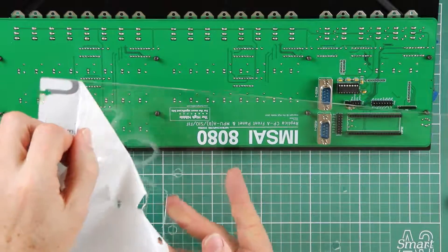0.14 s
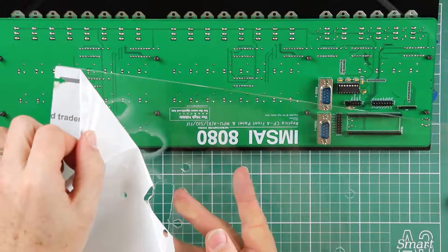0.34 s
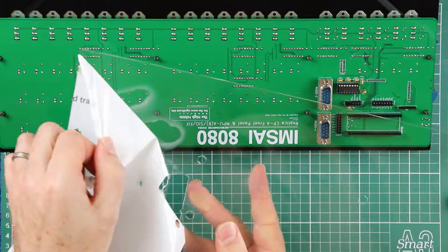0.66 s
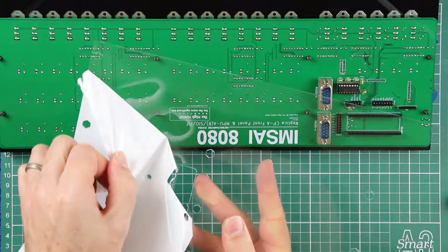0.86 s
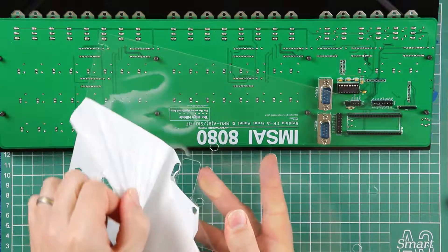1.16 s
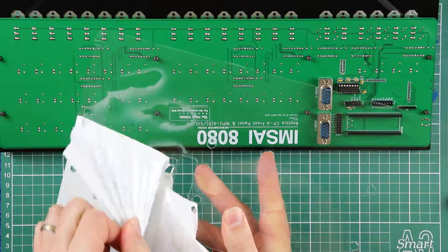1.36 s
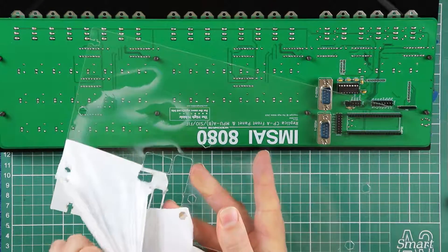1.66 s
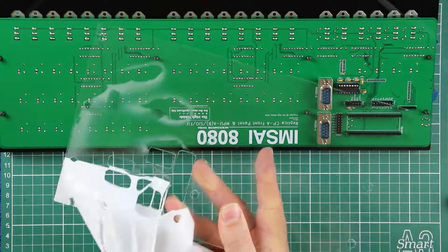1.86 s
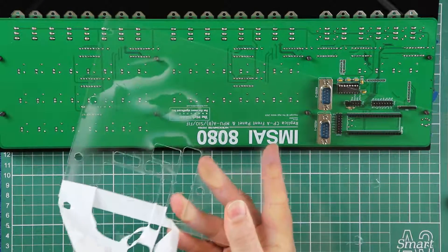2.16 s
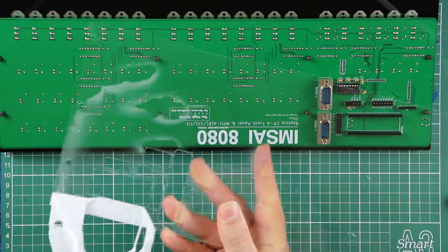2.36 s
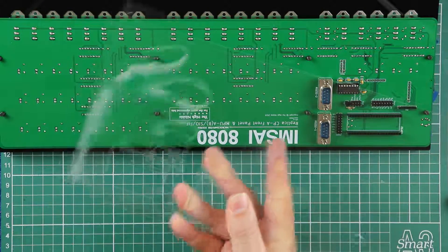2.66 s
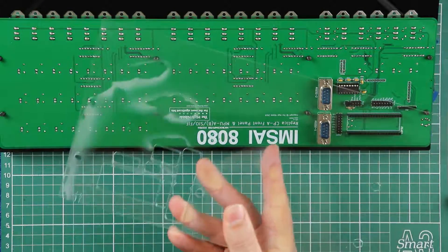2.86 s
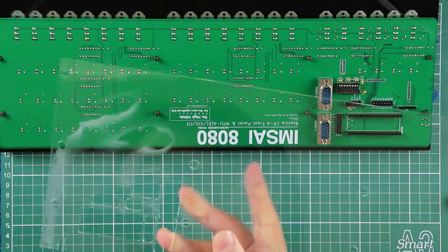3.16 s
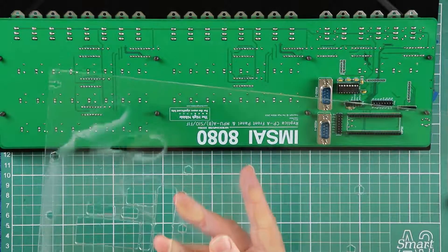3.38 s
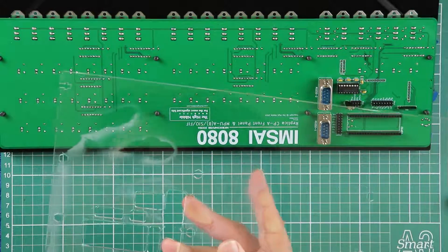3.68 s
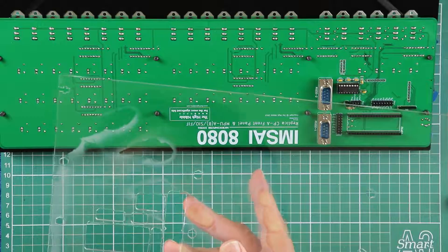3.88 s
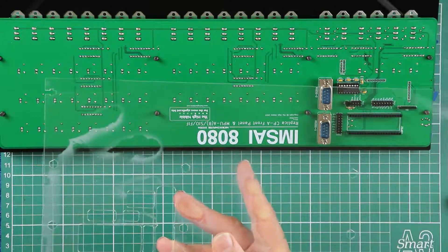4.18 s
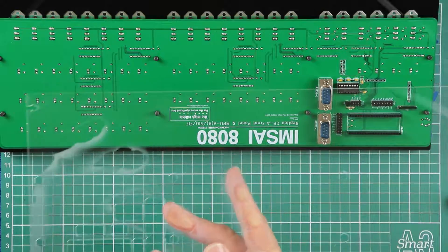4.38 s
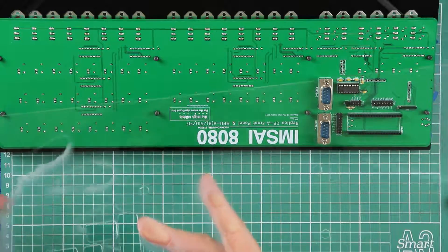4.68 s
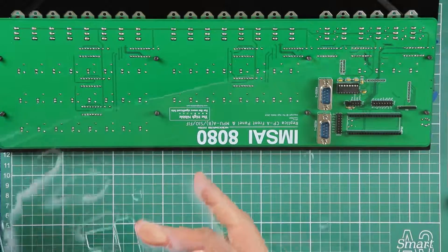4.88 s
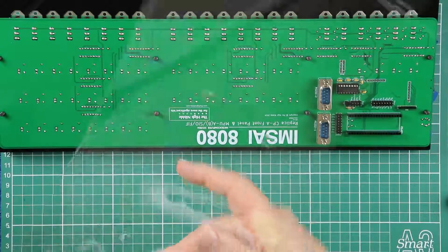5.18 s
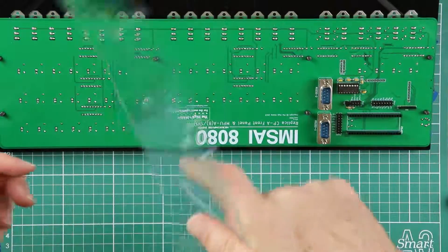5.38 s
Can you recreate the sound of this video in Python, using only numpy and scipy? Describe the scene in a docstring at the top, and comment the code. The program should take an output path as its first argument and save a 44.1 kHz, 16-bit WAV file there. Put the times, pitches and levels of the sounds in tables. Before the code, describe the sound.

Close to one microphone in a live room, film peels from an acrylic sheet: soft rubbing first, isolated snaps, then dense sizzling rips and bright crinkles for about two seconds. A strong pop frees a large piece, two shorter rips follow, and a loose swish puts the film aside. The end is nearly silent, with faint room air and hum.

```python
"""Peeling film off an acrylic sheet

Protective film is peeled off an acrylic sheet above a work table, close to one microphone in a live room.
The glue parts in a sizzle of dense grains; taut film snaps, slack film crinkles and taps, as shaped noise bursts.
Buckling patches pop as clusters of sines, and the bent sheet drones as noise through its bending modes.
Loose film swishes in swells of noise, loudest as it is put aside. Air noise and a faint hum lie underneath."""
import sys
import numpy as np
from scipy import signal
from scipy.fft import rfft, irfft, next_fast_len
from scipy.io import wavfile
from scipy.ndimage import uniform_filter1d, map_coordinates

SR = 44100
rng = np.random.default_rng(int(sys.argv[2]) if len(sys.argv) > 2 else 0)


def store_wav(level_fs):
    """Save 16-bit WAV to argv[1]."""
    pcm = np.round(np.clip(np.atleast_2d(level_fs), -1, 1) * 32767)
    wavfile.write(sys.argv[1], SR, pcm.T.astype(np.int16))


N = 244301


def amp(db):
    """Level law: decibels to amplitude gain."""
    return 10 ** (np.asarray(db) / 20)


def unit(x):
    """Normalisation: scale to rms 1."""
    return x / np.sqrt(np.mean(x ** 2) + 1e-20)


def along(points, hz):
    """Interpolation of (Hz, value) points on a logarithmic frequency axis."""
    point_hz, values = np.transpose(points)
    return np.interp(np.log(hz + 1), np.log(point_hz + 1), values)


def wobble(rate):
    """Slow random modulation: a smooth curve through random knots, rate of them a second."""
    return map_coordinates(rng.standard_normal(2048), [np.arange(N) * rate / SR], mode="wrap")


def filtered(x, response):
    """Linear filtering: the spectrum is multiplied by a response of frequency."""
    m = next_fast_len(len(x) + 8192)
    spectrum = rfft(x, m) * response(np.fft.rfftfreq(m, 1 / SR))
    return irfft(spectrum, m)[:len(x)]


def coloured(x, spectrum):
    """Spectral shaping: x filtered by a (Hz, dB) curve, at rms 1."""
    return unit(filtered(x, lambda hz: amp(along(spectrum, hz))))


def add(track, s, sound):
    """Superposition: mix a sound in at time s."""
    i = int(np.clip(round(s * SR), 0, N - 1))
    track[i:i + len(sound)] += sound[:N - i]


def gesture(start, length, attack, t60, slack=0):
    """Movement envelope: rises up to its start, holds while slackening in dB per s, then decays exponentially."""
    t = np.arange(round((attack + length + t60) * SR)) / SR - attack
    rise = np.minimum(1 + t / attack, 1) ** 2
    hold = amp(-slack * np.clip(t, 0, length))
    decay = 1000. ** (-np.maximum(t - length, 0) / t60)
    gain = np.zeros(N)
    add(gain, start - attack, rise * hold * decay)
    return gain


def background(air_db=-70):
    """Stationary noise floor: coloured noise for room air and microphone hiss, phase-wavering sines for hum."""
    # still air and hiss, relative spectrum: hz, level_db
    air_spectrum = [(18, -46), (30, -12.5), (98, -2), (145, -11), (199, -25), (273, -16), (740, -24.5),
                    (1010, -38.5), (5900, -55), (11700, -31), (13000, -24), (16000, -32.5)]
    # hum tones, rms: pitch_hz, level_db
    hum_tones = [(100.5, -72.5), (134.6, -79)]
    t = np.arange(N) / SR
    hum = np.zeros(N)
    for hz, db in hum_tones:
        hum += amp(db) * np.sqrt(2) * np.sin(2 * np.pi * hz * t + 0.2 * wobble(3))
    return hum + amp(air_db) * coloured(rng.standard_normal(N), air_spectrum)


def sheet(drone_trim_db=-2, rumble_trim_db=-1):
    """Forced plate vibration: noise excites resonant bending modes, and swaying pushes air as low noise."""
    # the pull bends the sheet: start_s, length_s, level_db (before the drone trim)
    bends = [(.17, .27, -60), (.65, 0.11, -56), (1.32, 0.048, -61), (1.59, 0.11, -56), (1.87, 0.042, -48.5),
             (2.03, 0.042, -60.5), (2.29, .2, -58), (2.6, .06, -57), (3.02, 0.065, -63),
             (3.36, 0.33, -50.5), (3.76, 0.3, -64), (4.38, 0.12, -56), (4.98, .1, -71), (5.41, 0.15, -66)]
    # the sheet sways and pushes air: start_s, length_s, level_db (before the rumble trim)
    sways = [(.32, 0.27, -60), (1.34, .05, -62.5), (1.58, 0.11, -53.5), (2.25, 0.13, -53),
             (2.52, 0.14, -55), (2.97, .18, -60.5), (3.57, .8, -62.5), (4.5, 0.18, -50.5),
             (5.39, 0.066, -57)]
    # bending modes: pitch_hz, width_hz, relative level_db
    bending_modes = [(185, 8.9, -0.5), (239, 59, -17.5), (431.5, 190, -20.5)]
    # pushed air, relative spectrum: hz, level_db
    rumble_spectrum = [(11, -30.5), (18, -2), (38, 4.5), (65, -4), (103, -4.5), (140, -14), (180, -34),
                       (310, -120)]
    attack_s, release_t60_s = 0.052, 0.43
    held_drone_db, held_rumble_db = -78, -72  # floors while the sheet is only held, before the trims

    def moved(rows):
        return sum(amp(db) * gesture(s, length, attack_s, release_t60_s) for s, length, db in rows)

    def plate(f):
        total = 0
        for k, (centre, width, db) in enumerate(bending_modes):
            damping = 1j * f * width
            total = total + (-1) ** k * amp(db) * damping / (centre ** 2 - f ** 2 + damping)
        return total / (1 + (f / 520) ** 4)  # the upper skirts roll off

    drone_level = np.hypot(amp(held_drone_db), moved(bends))
    rumble_level = np.hypot(amp(held_rumble_db), moved(sways))
    drone = unit(filtered(rng.standard_normal(N), plate))
    rumble = coloured(rng.standard_normal(N), rumble_spectrum)
    return drone_level * amp(drone_trim_db) * drone + rumble_level * amp(rumble_trim_db) * rumble


def grains(rate, spread_db, smooth):
    """Shot noise: tiny clicks of uneven size at random moments, over a share of smooth noise."""
    sizes = amp(spread_db * np.minimum(rng.standard_normal(N), 2))
    clicks = (rng.random(N) < rate / SR) * rng.choice([-1, 1], N) * sizes
    return unit(unit(clicks) + smooth * rng.standard_normal(N))


def patchy(x, depth_db):
    """Time-varying colour of the flexing film: gains wander over frequency and time."""
    z = signal.stft(x, nperseg=512)[2]
    field = rng.standard_normal(z.shape)
    for _ in range(2):
        field = uniform_filter1d(uniform_filter1d(field, size=6, axis=0), size=9, axis=1)
    return unit(signal.istft(z * amp(depth_db * unit(field)), nperseg=512)[1][:N])


def pulling():
    """Stroke envelopes: the summed gains of sizzle and rubbing as the film parts and slides."""
    # strokes: start_s, length_s, rise_s, sizzle_db, rub_db (levels before trims), slackening_db_per_s
    pulls = [(.001, 0.52, .001, -50.5, -52, 53), (0.287, 0.049, 0.14, -45, -66.5, 38),
             (0.813, 0.14, 0.057, -38.5, -46.5, 101), (1.019, .33, 0.021, -39.5, -54.5, 24),
             (1.377, 0.21, 0.045, -40.5, -62, 10.5), (1.58, 0.13, 0.11, -63, -55.5, 52.5),
             (1.823, .15, 0.15, -52.5, -56.5, 0), (2.164, 0.1, .02, -58, -53, -3),
             (2.279, .12, .06, -41.5, -48.5, 4), (2.667, 0.25, .02, -44, -65, 24),
             (3.065, 0.013, 0.12, -54, -58.5, -1), (3.313, 0.15, 0.056, -36.5, -51, 16),
             (3.464, 0.24, 0.022, -70, -55, 28), (3.683, 0.12, 0.14, -37, -48.5, 17),
             (3.822, 0.27, 0.016, -49.5, -51, 43.5), (4.291, 0.082, 0.0403, -59.5, -70, 2),
             (4.427, 0.14, 0.032, -68, -42, 74), (5.387, 0.17, .36, -65.5, -71, 25)]
    release_t60_s = .17
    strokes = np.array([gesture(s, length, rise, release_t60_s, slack)
                        for s, length, rise, _, _, slack in pulls])
    levels_db = [(sizzle_db, rub_db) for _, _, _, sizzle_db, rub_db, _ in pulls]
    return amp(levels_db).T @ strokes


def peeling(sizzle_trim_db=-5, rub_trim_db=-2, flutter_db=1.0):
    """Adhesive fracture and friction: threads break in sizzle and crackle as film rubs; all waver with the pull."""
    # relative spectra of breaking glue, rubbing film and scattered crackles: hz, level_db
    sizzle_spectrum = [(1180, -36), (2000, -17), (2640, -22.5), (4150, -2.5), (4650, 1.5), (10500, 6),
                       (13400, 2), (16000, -16.5)]
    rub_spectrum = [(140, -39), (230, -7), (310, -11), (615, -3.5), (999, 0.5), (1260, -4.5), (1520, -1.5),
                    (2330, -4), (2570, -3), (3730, -4), (4500, -5.5), (5850, -32.5), (9900, -120)]
    crackle_spectrum = [(250, -13), (900, -10.5), (3000, -9), (7000, 9), (11500, -3.5), (15500, 1.5)]
    sizzle_level, rub_level = pulling()
    pull_db = flutter_db * wobble(45)
    sizzle = patchy(coloured(grains(rate=1200, spread_db=4, smooth=1), sizzle_spectrum), depth_db=1)
    rub = patchy(coloured(grains(rate=400, spread_db=5, smooth=.8), rub_spectrum), depth_db=1.6)
    crackle = .35 * coloured(grains(rate=110, spread_db=5, smooth=0), crackle_spectrum)
    parting = sizzle_level * amp(sizzle_trim_db + pull_db)
    sliding = rub_level * amp(rub_trim_db + pull_db)
    return parting * sizzle + sliding * rub + np.hypot(parting, sliding) * crackle


def jolts(count=8):
    """Impulsive excitations: every tap, snap, crinkle and tick, listed with its level, decay and band balance."""
    # taut film snaps free, slack film creases, film and fingers tap the sheet, some taps dull, some bright:
    # start_s, level_db (over 5 ms), base_t60_s, body_db, sparkle_db (both against the crack band)
    snap_rows = [(.2458, -17.5, .015, -9, -1), (.4496, -25.5, .007, -9.5, -7.5),
                 (.5085, -41.5, .011, -10, 2), (.842, -21, .005, -10.5, -0.5), (.9602, -14.5, .02, -9, 12),
                 (1.042, -31, .012, -11.5, 6.5), (1.0888, -25.5, .009, -13, -6.5),
                 (1.105, -31.5, .012, -8, 0), (1.138, -23.5, .012, -9, 0), (1.2064, -22.5, .014, -6.5, -1),
                 (1.2125, -31, .008, -7.5, -1.5), (1.251, -24, .013, -10.5, -14.5),
                 (1.3247, -21, .015, -9, -2), (1.3865, -18.5, .018, -13, -0.5),
                 (1.3935, -29.5, .006, -24, 1.5), (1.4118, -24.5, .012, -12.5, 13.5),
                 (2.5609, -26, .005, -18.5, -12.5), (2.603, -14, .017, -18, -3.5),
                 (2.607, -17.5, .022, -9.5, 8), (2.6263, -20, .013, -26.5, -5.5),
                 (2.7266, -24, .02, -23, 15), (3.2995, -19.5, .02, -13.5, -2.5),
                 (3.4258, -29.5, .005, -17, -2), (3.4424, -27, .008, -5.5, 9.5),
                 (3.7556, -22.5, .023, -6, 5), (3.9474, -43.5, .008, -25, 12), (4.733, -54, .05, -7, 10)]
    crinkle_rows = [(.7894, -30, .011, -4, 16), (.8096, -35, .008, -6.5, 3.5), (.8195, -30, .025, -1, 5),
                    (1.7939, -29, .013, -2, 4), (1.887, -25, .009, -3, 3.5), (1.8957, -21.5, .014, -7.5, 6),
                    (1.91, -28, .009, -0.5, 7), (1.9495, -26, .014, 0.5, 10.5),
                    (1.9567, -26, .01, -9.5, 16), (1.9821, -29, .007, -8, 2.5),
                    (2.0349, -18.5, .018, -9, 4), (2.045, -28.5, .004, -5, 5), (2.0616, -27.5, .018, 7, 7),
                    (2.0736, -31, .004, -6.5, 10.5), (2.0833, -31, .004, -3.5, 3),
                    (2.2905, -27, .018, 0.5, 14.5), (2.3063, -35, .014, -13, 6),
                    (2.318, -26, .01, -9, 10.5), (2.3335, -34, .01, -13, 7.5), (2.3436, -29.5, .01, -9, 14),
                    (2.3686, -29.5, .016, 0, -5.5), (2.3801, -28.5, .009, -3, 1.5),
                    (3.1007, -27.5, .008, -8.5, 26.5)]
    tap_rows = [(.0646, -41.5, .018, -4, -33), (.1035, -50, 0.015, 7, -11), (.3384, -42.5, .033, 11, -6),
                (.4109, -43, 0.03, 17, 11), (.6584, -49, 0.019, 19.5, 10), (2.4454, -34, .06, 0, -17.5),
                (5.4088, -60, 0.086, 3, 19)]
    # the film settles in fading runs of ticks: start_s, length_s, first level_db (before a random spread)
    tick_runs = [(0.799, .02, -33.5), (1.019, .07, -49), (1.428, .12, -31), (2.097, .03, -34.5),
                 (2.18, .03, -43), (2.2677, .07, -38.5), (2.642, .025, -31), (2.721, .015, -25.5)]
    # a large piece of film lets go and the sheet thumps: knock_db, body_db, sparkle_db (against the crack band)
    release_colour = (11, -7.5, -12.5)
    release_s, release_db, release_t60_s = 2.6045, -25, 0.027
    tick_gap_s, tick_fade_db_per_s, tick_spread_db = .017, 69.5, 2
    tick_t60_s = 0.014
    tick_colour = np.array([-9.5, -5.5, 18])  # mean knock, body and sparkle in dB against the crack band

    rows = [(release_s, release_db, release_t60_s, *release_colour)]
    # each kind has its own level of low knock, in dB against its body
    for table, knock_db in [(snap_rows, -11.5), (crinkle_rows, -3), (tap_rows, -1.5)]:
        for s, db, t60, body_db, sparkle_db in table:
            rows.append((s, db, t60, body_db + knock_db, body_db, sparkle_db))
    for start, length, db in tick_runs:
        gaps = tick_gap_s * (.5 + rng.random(count))
        ages = np.cumsum(gaps) - gaps[0]
        for age, luck in zip(ages, tick_spread_db * rng.standard_normal((count, 4))):
            # ticks past the end of the run are silent
            level = db - tick_fade_db_per_s * age + luck[0] if age < length else -np.inf
            rows.append((start + age, level, tick_t60_s, *(tick_colour + luck[1:])))
    return rows


def snaps(events, ring_db=-25, ring_t60=0.14, slow_hz=900, lead_db=-25, lead_s=0.0017):
    """Impulse response of film: a jolt whose dense modes, as band noise, die fastest when high."""
    # knock, body, crack, sparkle: low_hz, high_hz
    film_bands = [(220, 1206), (1100, 3580), (4300, 9100), (8300, 14130)]
    out, early = np.zeros(N), .008  # s by which each burst starts ahead of its jolt
    t = np.arange(4096) / SR - early
    after = np.maximum(t, 0)
    attack, jolt = 1 - np.exp(-after / .00015), .9 * np.exp(-after / .0004)
    lead = amp(lead_db) * np.exp(-np.abs(t) / lead_s)  # faint noise on both sides of the jolt
    ring = amp(ring_db) * 1000. ** (-after / ring_t60)
    filters = [signal.butter(3, band, "bandpass", fs=SR, output="sos") for band in film_bands]
    all_noises = rng.standard_normal((len(events), 4, len(t)))
    for (s, db, base_t60, knock_db, body_db, sparkle_db), noises in zip(events, all_noises):
        if np.isinf(db):
            continue
        shares = amp([knock_db, body_db, 0, sparkle_db])
        shares = shares / np.linalg.norm(shares)
        for (_, high_hz), sos, share, noise in zip(film_bands, filters, shares, noises):
            life = base_t60 * (1 + slow_hz / high_hz)  # low modes last longest
            envelope = lead + attack * (jolt + 1000. ** (-after / life) + ring)
            burst = signal.sosfilt(sos, noise * envelope)
            burst *= np.sqrt(.005 * SR) / np.linalg.norm(burst)  # energy of 5 ms at rms 1
            add(out, s - early, amp(db) * share * burst)
    return out


def pops(split=0.11, side_db=-5, count=6):
    """Buckling instability: a patch swells within milliseconds and rings in a cluster of close modes."""
    # buckling patches: start_s, pitch_hz, level_db (envelope peak of the middle mode)
    patches = [(.412, 1740, -37.5), (.41, 410, -45), (.456, 432, -43.5), (.656, 398, -37.5),
               (.658, 1393, -38.5), (.961, 7960, -15), (1.139, 2420, -27.5), (1.207, 2280, -31),
               (1.326, 4280, -23), (1.581, 1710, -43), (1.59, 1860, -39), (1.795, 3070, -32),
               (1.888, 2790, -25), (1.8874, 11900, -15.5), (1.888, 666, -34), (1.909, 829, -30),
               (1.909, 2730, -28), (2.035, 3500, -25.5), (2.035, 1786, -28.5), (2.367, 364, -33.5),
               (2.366, 1114, -33.5), (2.603, 861, -29), (3.082, 1430, -42.5), (3.628, 316, -42),
               (3.688, 6680, -23), (3.818, 815, -41), (4.3, 502.4, -62.5), (5.407, 1443, -53)]
    # one patch pops again and again; below 1, hurry crowds its pops together towards the end
    stutter_from_s, stutter_to_s, hurry = 1.479, 1.582, .68
    stutter_hz, stutter_db = 1064, -43
    # the exponential factor falls 80 dB in this time at 1 kHz; higher pops die sooner by this power of pitch
    decay_s, shortens = .017, 0.28
    stutter = stutter_from_s + (stutter_to_s - stutter_from_s) * np.linspace(0, 1, count) ** hurry
    rows = patches + [(s, stutter_hz, stutter_db) for s in stutter]
    out, t = np.zeros(N), np.arange(SR // 8) / SR
    for (s, hz, db), phases in zip(rows, rng.uniform(0, 2 * np.pi, (len(rows), 3))):
        modes = np.sin(2 * np.pi * hz * np.outer([1 - split, 1, 1 + split], t) + phases[:, None])
        u = t * np.log(1e4) / decay_s * (hz / 1000) ** shortens
        swell = u * np.exp(1 - u)  # peaks at 1
        add(out, s, amp(db) * swell * (amp([side_db, 0, side_db]) @ modes))
    return out


def swishes():
    """Sliding friction: slack film moves over itself in short rushes of dense crinkles that rise and decay."""
    # rushes: start_s, level_db, rise_s, t60_s
    rushes = [(0.905, -41, 0.0026, 0.076), (1.701, -56.5, 0.0099, 0.16), (2.828, -46.5, 0.022, 0.4),
              (3.068, -43.5, 0.012, 0.39), (3.61, -47.5, 0.015, 0.12), (4.378, -38.5, 0.03, 0.41),
              (4.403, -37.5, 0.0067, 0.064), (5.508, -62, 0.0027, 0.032)]
    # relative spectrum: hz, level_db
    swish_spectrum = [(120, -41), (200, -20.5), (432, -7.5), (538, 0.5), (683, -12.5), (1180, -2),
                      (1910, -2.5), (2130, 0), (5420, -2), (6400, -4), (7540, -2.5), (10700, -8.5),
                      (16000, -16.5)]
    level, t = np.zeros(N), np.arange(SR // 2) / SR
    for s, db, rise, t60 in rushes:
        decay = 1000. ** (-np.maximum(t - rise, 0) / t60)
        add(level, s, amp(db) * np.minimum(t / rise, 1) * decay)
    return level * coloured(grains(rate=2400, spread_db=0.5, smooth=1.0), swish_spectrum)


def table_echo(x, table_db=-15, table_s=0.0041):
    """Early diffuse reflection: the table throws back a quick, scattered echo."""
    lag = np.arange(2048) / SR - table_s
    echo = rng.standard_normal(len(lag)) * (lag > 0) * np.exp(-np.abs(lag) / .002)
    return amp(table_db) * signal.fftconvolve(x, echo / np.linalg.norm(echo))[:N]


def room(x, wet_db=-11, build_s=0.0063, count=5):
    """Reverberation: a noise tail swells, then decays by frequency; each of count equal spans has its own tail."""
    # decay time: hz, t60_s
    decay_curve = [(200, 0.61), (1500, 0.75), (6000, 0.55), (11000, 0.37), (16000, 0.46)]
    # colour of the walls, on top of the wet level: hz, gain_db
    wall_colour = [(150, 2.5), (600, -4.5), (2500, -1), (6000, -0.5), (11000, -1), (15500, -10.5)]
    out = np.zeros(N)
    for part in np.array_split(np.arange(N), count):
        hz, t, z = signal.stft(rng.standard_normal(32768), SR, nperseg=256)
        decay = 1000. ** (-t / along(decay_curve, hz)[:, None])
        build = 1 - np.exp(-t / build_s)
        tail = signal.istft(z * decay * build, SR, nperseg=256)[1]
        add(out, part[0] / SR, signal.fftconvolve(x[part], tail / np.linalg.norm(tail)))
    return amp(wet_db) * filtered(out, lambda f: amp(along(wall_colour, f)))


def scene(count=3):
    """Directivity: snaps differ in each direction, so each wall gets its own; one microphone feeds both channels."""
    rustle = pops() + peeling() + swishes()
    events = jolts()
    directions = [snaps(events) + rustle for _ in range(count)]
    walls = sum(room(film) for film in directions) / np.sqrt(count)
    direct = directions[0]
    mono = direct + table_echo(direct) + walls + sheet() + background()
    return np.array([mono, mono])


def record(dry, ceiling=1.0, top_hz=15950):
    """Saturation and band limiting: sharp peaks are rounded off, then a steep low-pass cuts the top."""
    soft = dry / (1 + np.abs(dry / ceiling) ** 4) ** (1 / 4)
    return np.array([filtered(side, lambda hz: 1 / np.sqrt(1 + (hz / top_hz) ** 120)) for side in soft])


dry = scene()
out = record(dry)
store_wav(out)
```